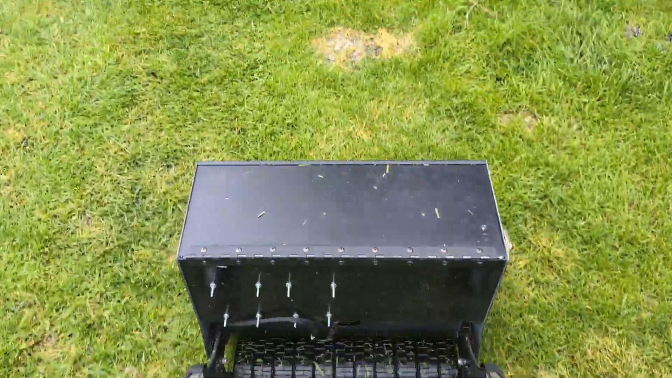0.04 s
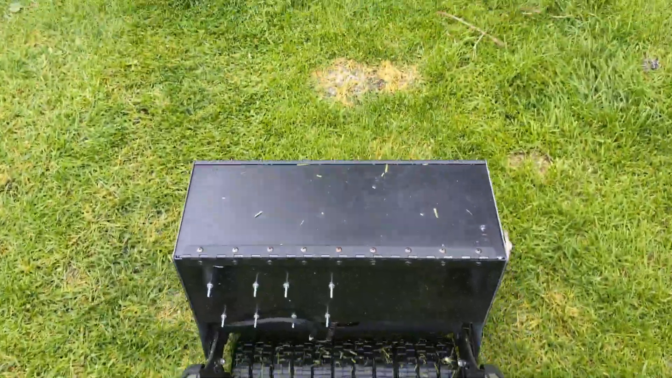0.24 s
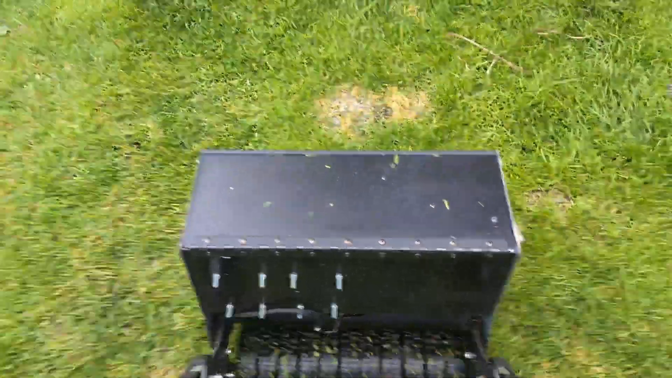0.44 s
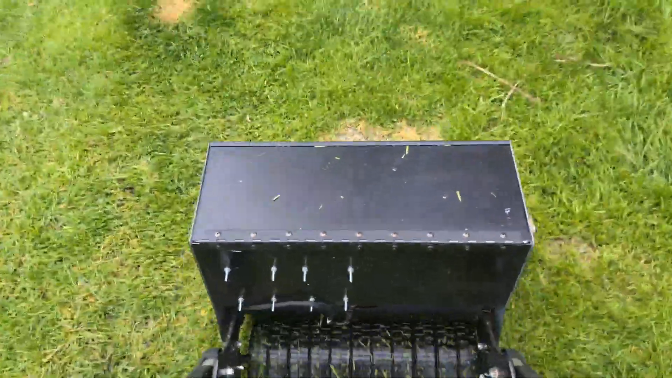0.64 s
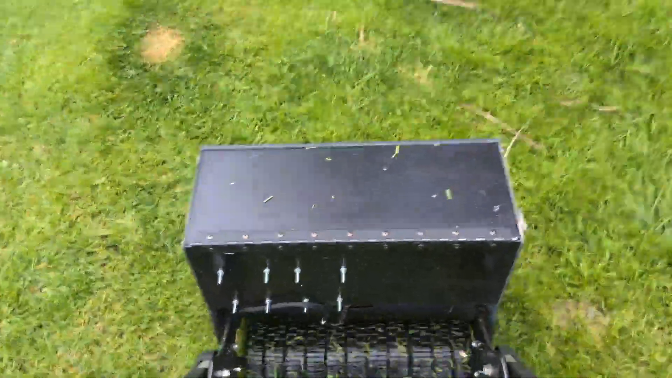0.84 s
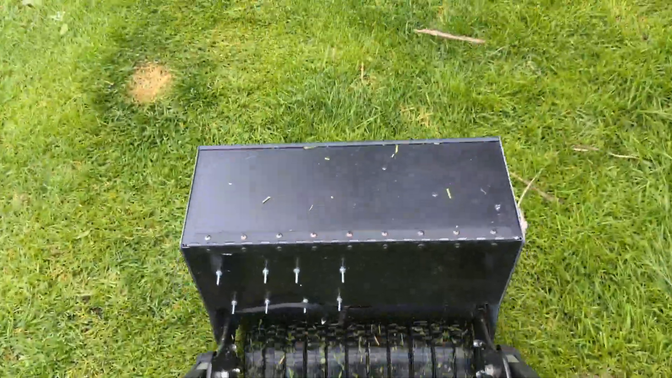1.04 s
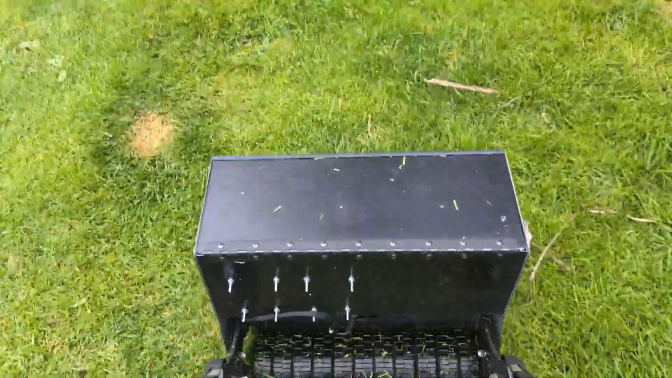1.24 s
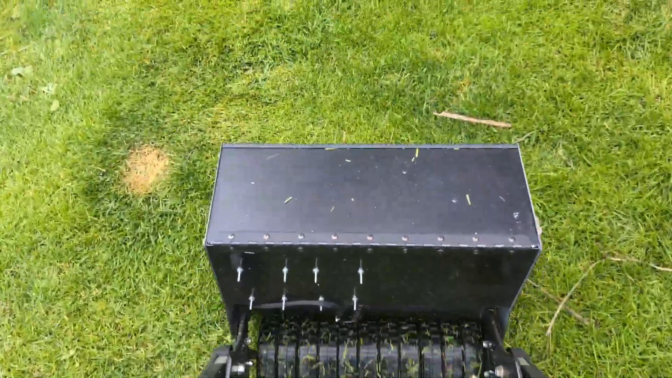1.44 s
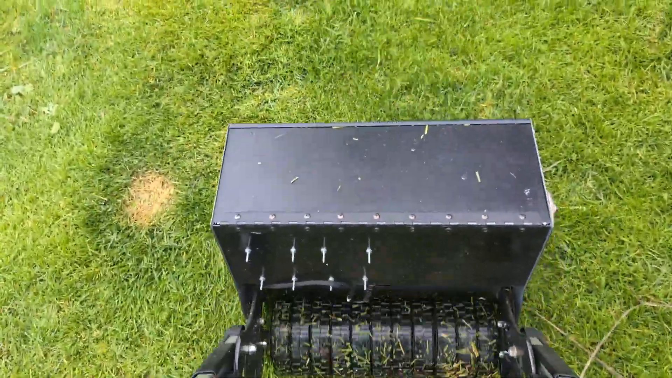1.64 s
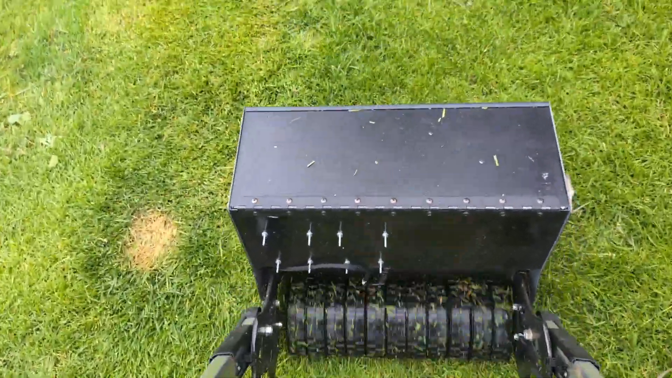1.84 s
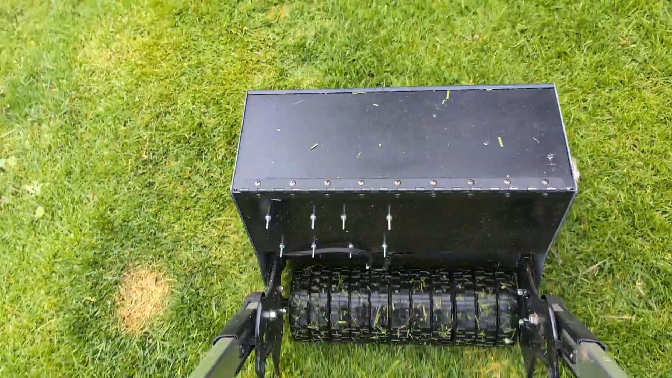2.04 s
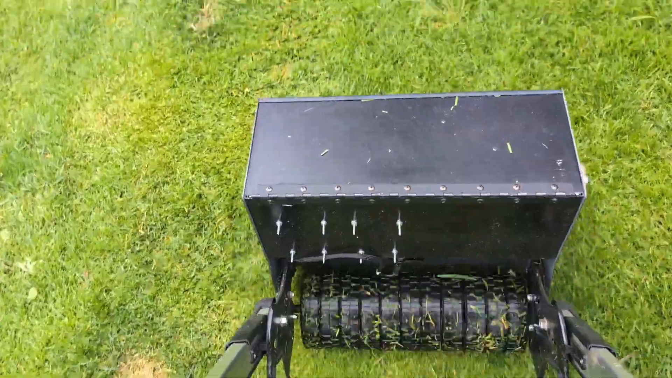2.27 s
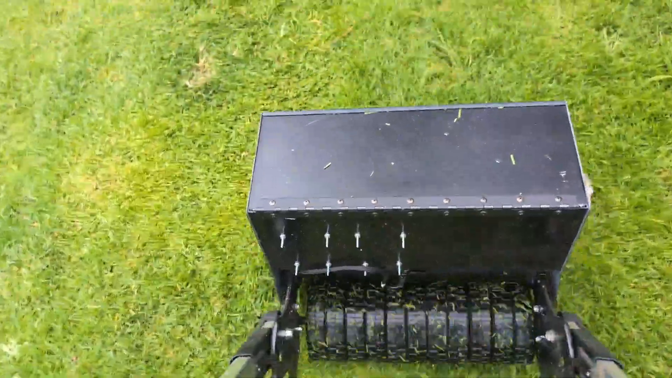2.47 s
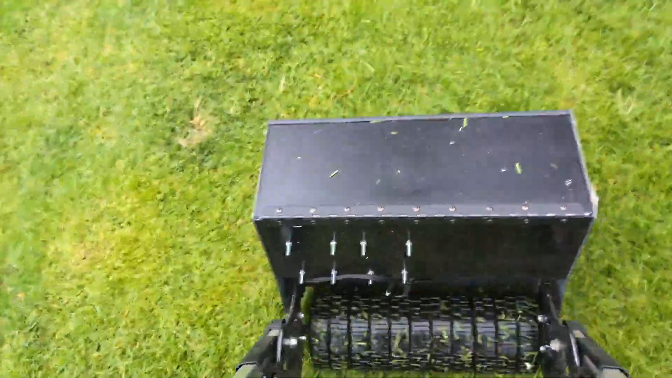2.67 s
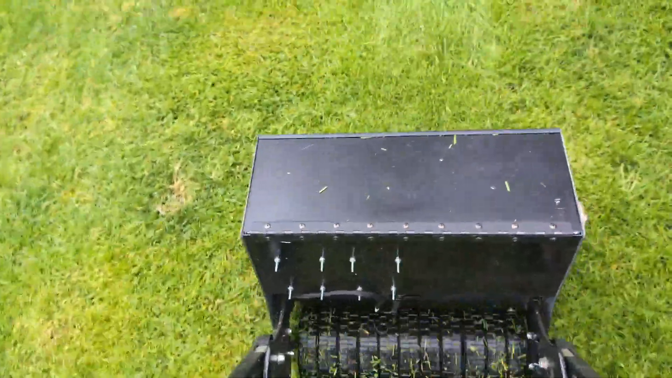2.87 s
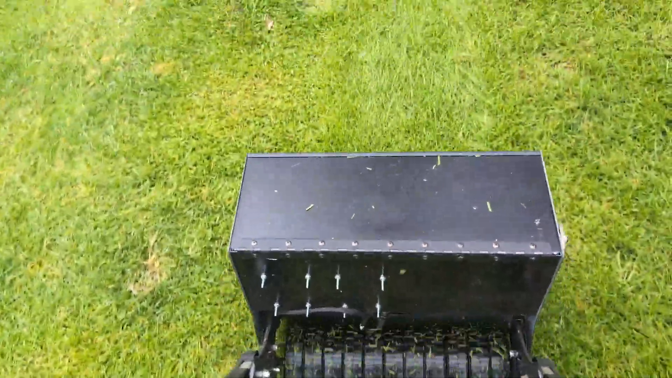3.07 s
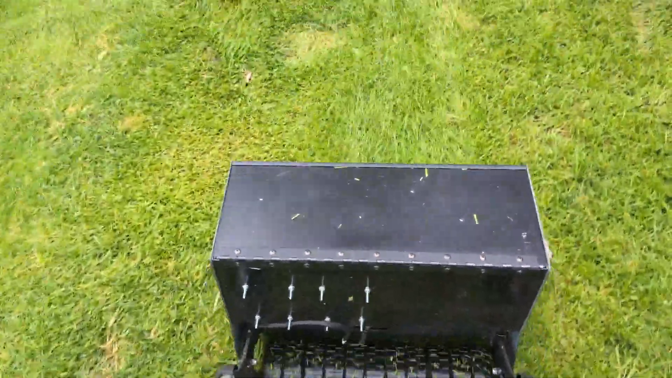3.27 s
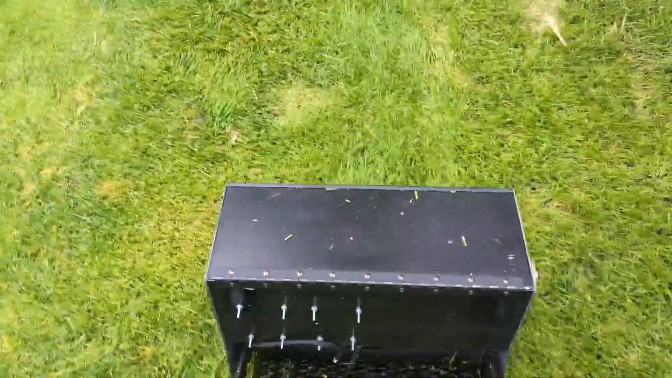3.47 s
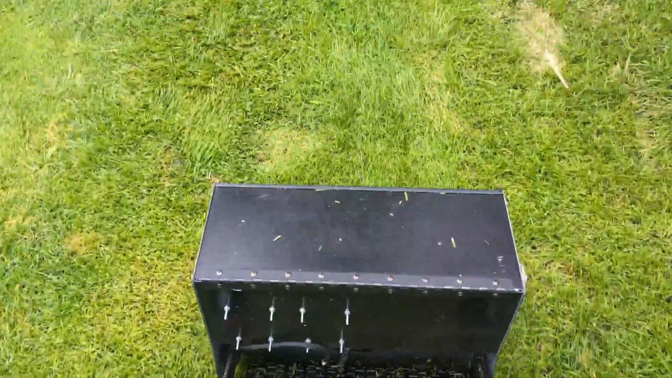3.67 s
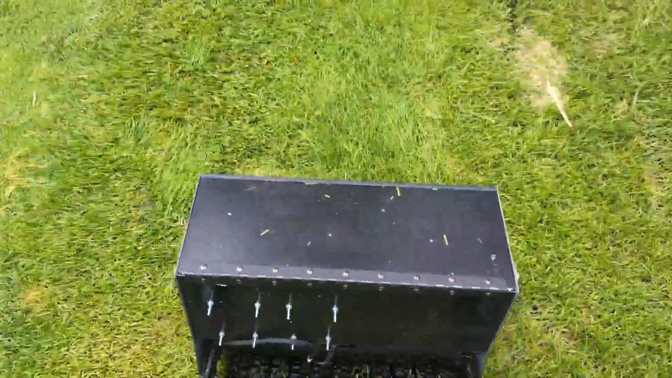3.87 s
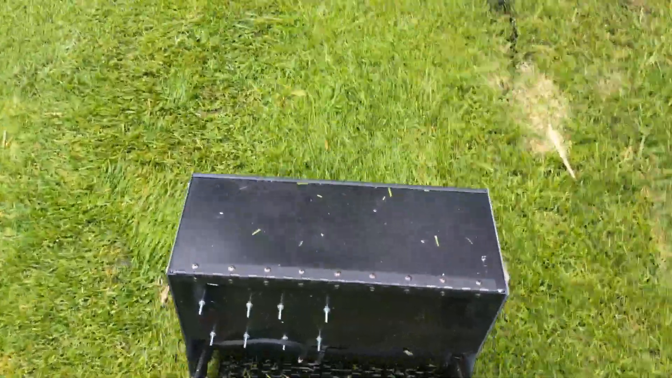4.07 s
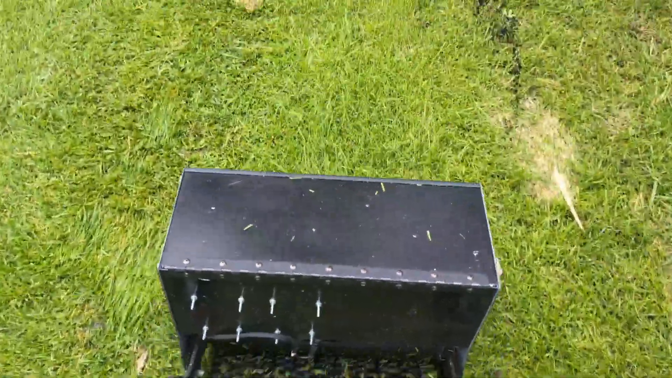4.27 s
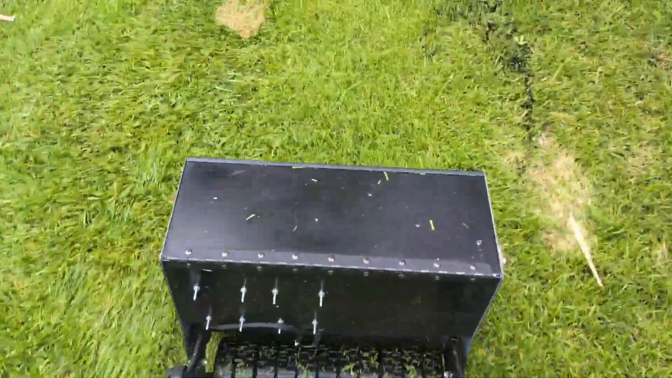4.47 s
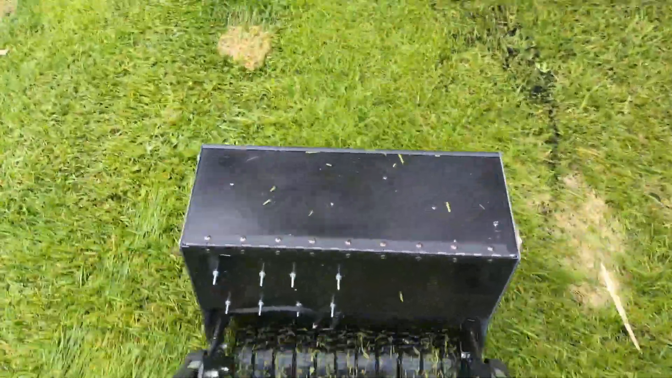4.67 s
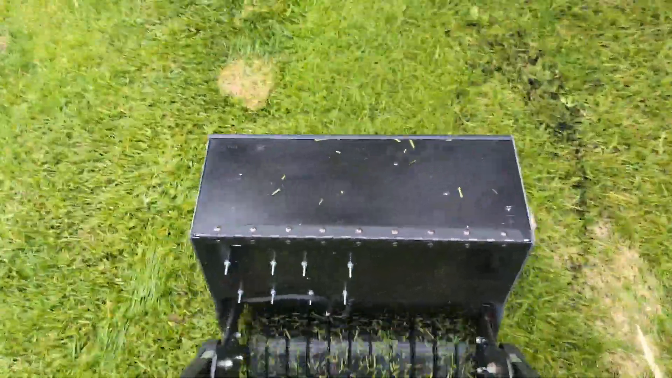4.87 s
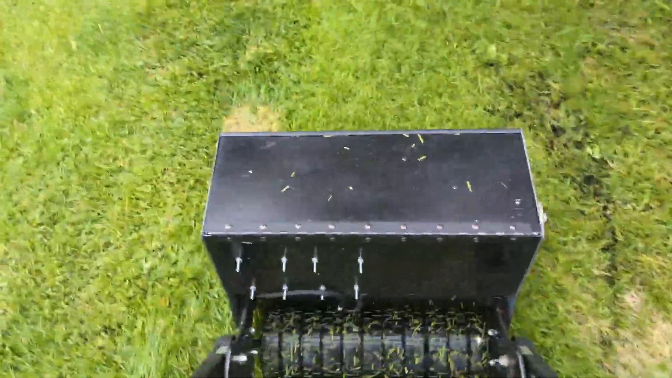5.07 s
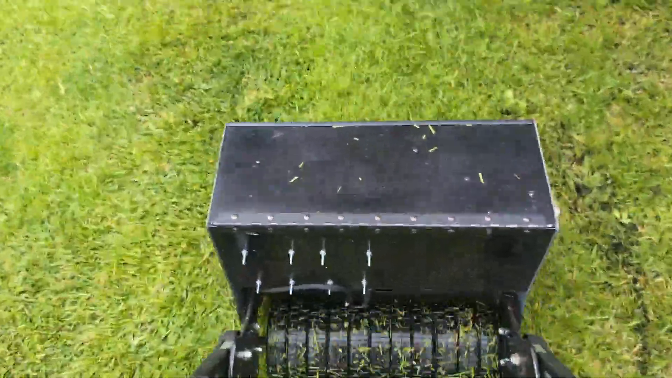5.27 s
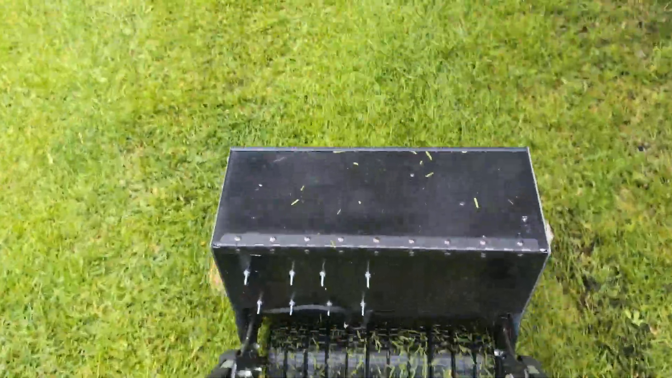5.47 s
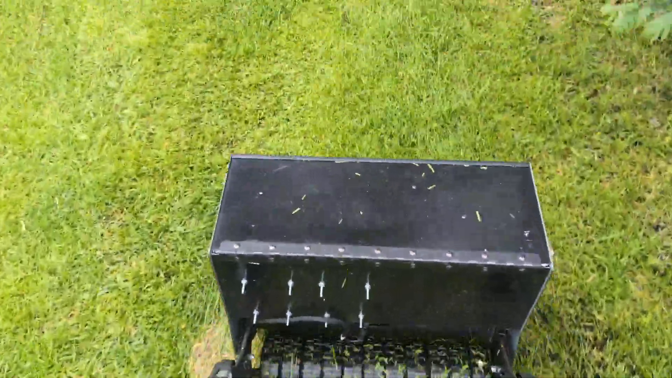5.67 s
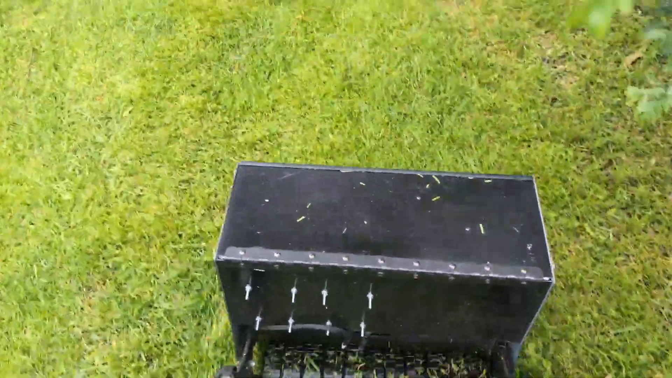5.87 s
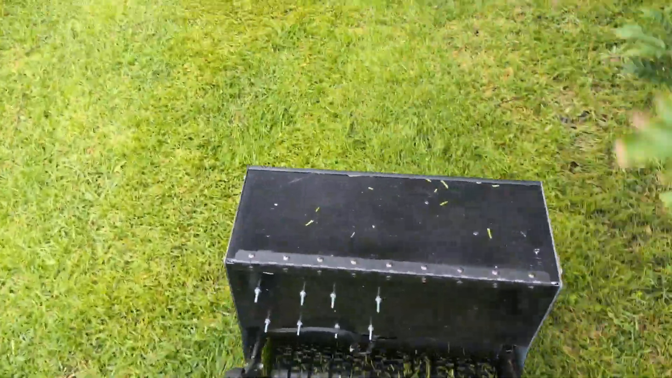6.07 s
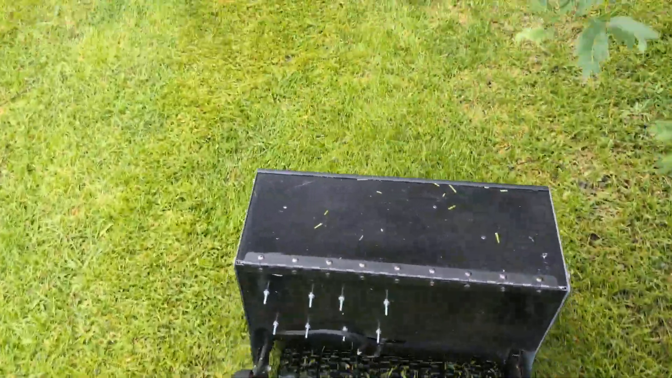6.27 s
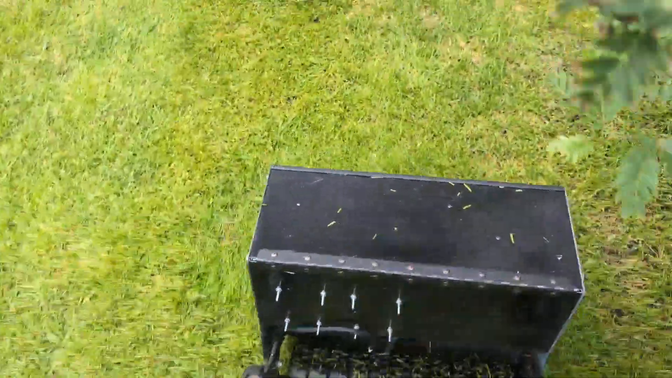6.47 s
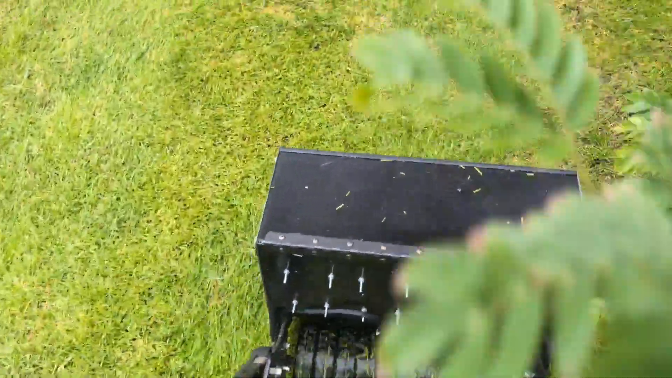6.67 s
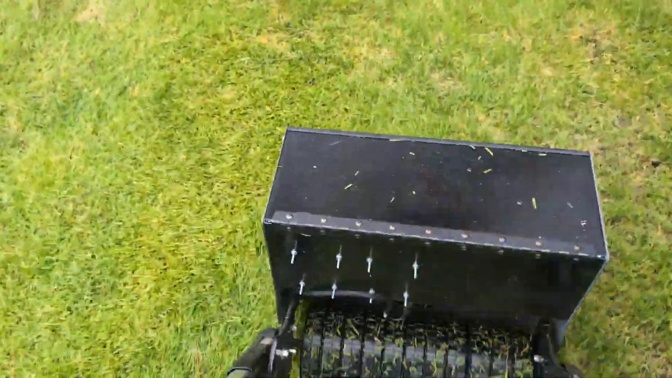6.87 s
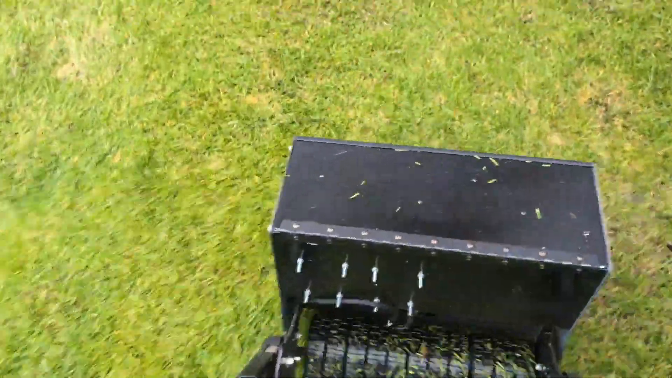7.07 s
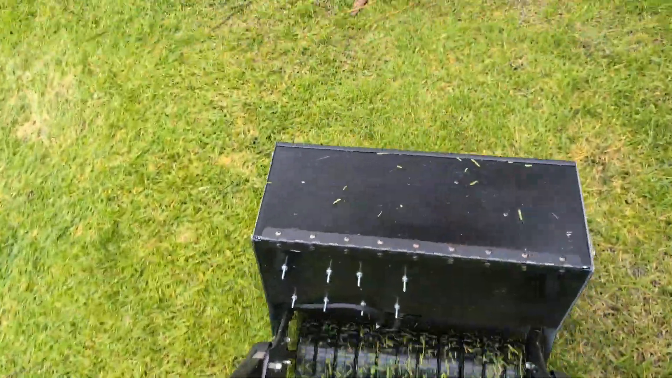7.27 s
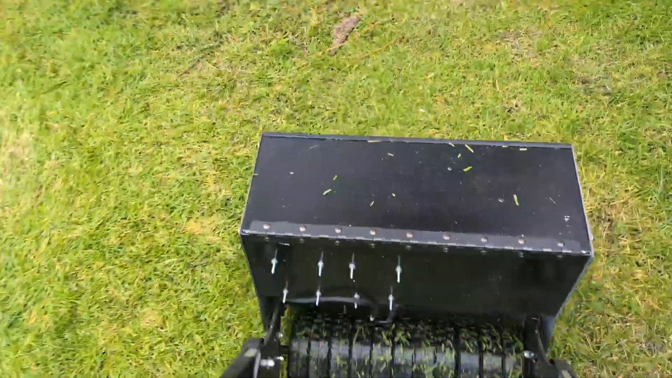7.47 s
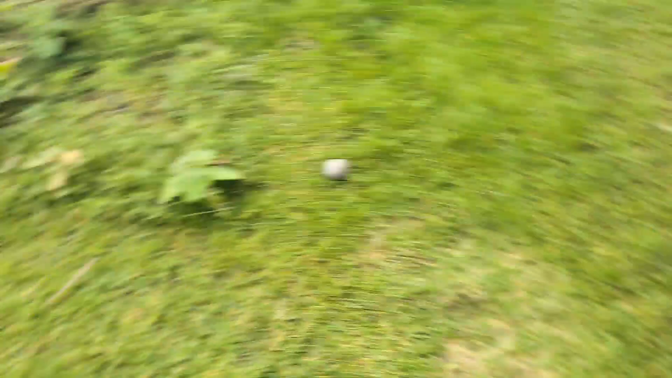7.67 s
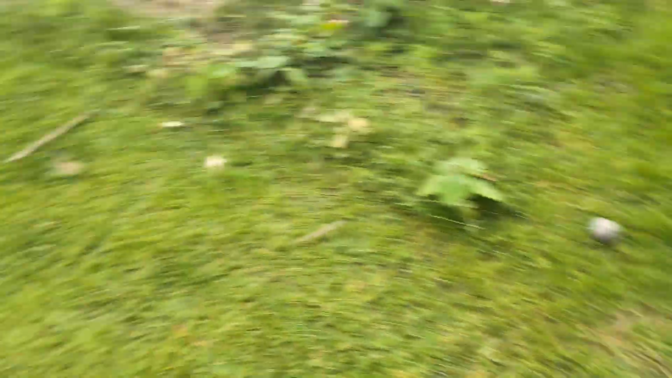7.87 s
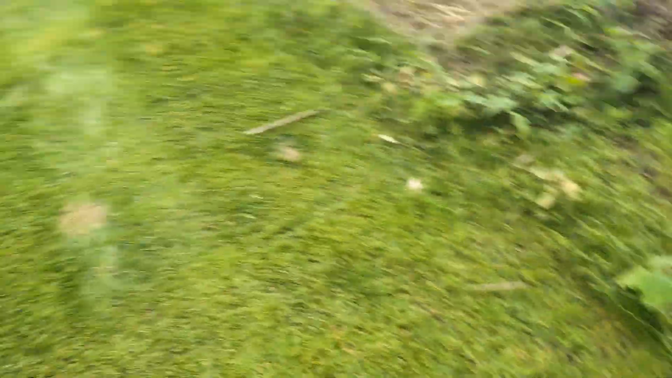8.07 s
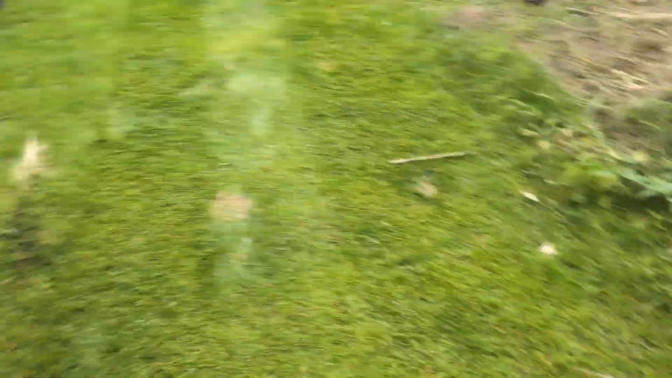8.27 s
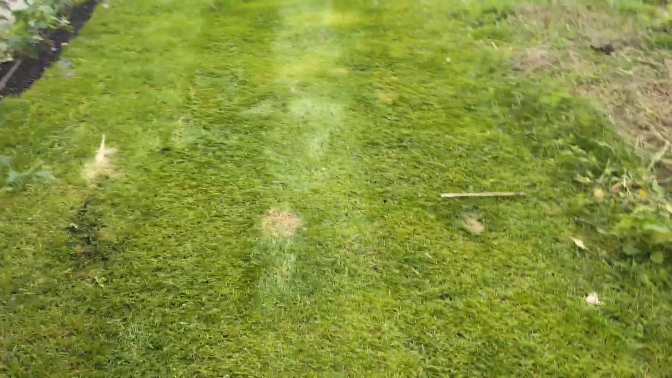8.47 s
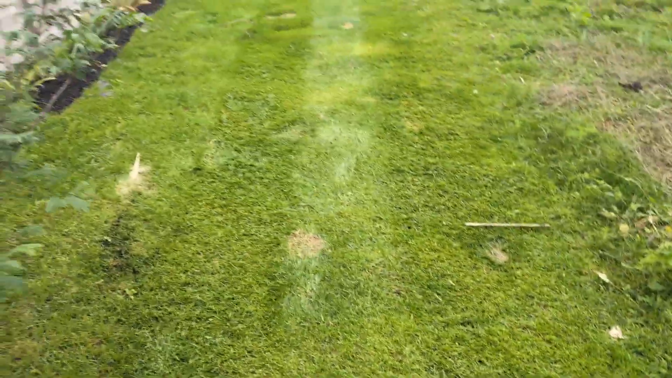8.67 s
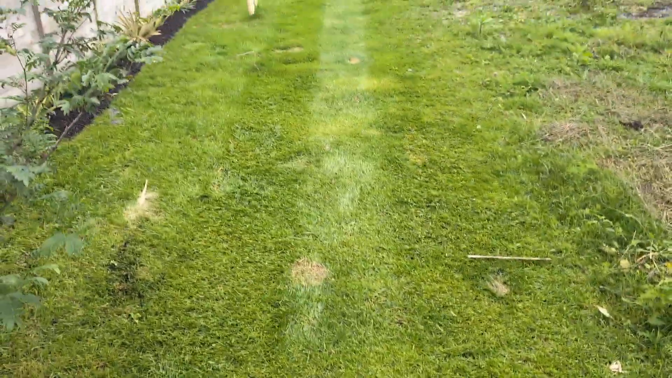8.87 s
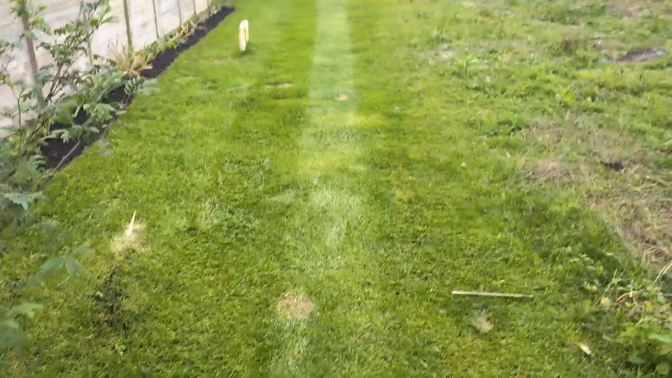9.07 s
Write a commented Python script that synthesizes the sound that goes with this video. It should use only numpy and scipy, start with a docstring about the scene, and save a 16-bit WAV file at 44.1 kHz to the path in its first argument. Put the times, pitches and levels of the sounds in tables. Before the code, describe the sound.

Stereo from the mower's handle outdoors. Five blades scrape a steel knife in a fast fluttering chatter, strongest on the right, with fine high snipping on the left, box rattle and motor whine throughout. The din stops instantly with a clank and brief squeak; loose parts clack, distant birds twitter, and a foot crackles over grass and a sharp twig against quiet rumble and hiss.

```python
"""A walled and fenced yard, heard from the handle of a battery reel mower pushed over its lawn.
Motor and drive tones follow the reel's angle; knocks rattle the resonant grass box;
five blades scrape the bed knife on every turn, snip grass and spray clippings. The mower's sound breaks off
at once, with a clank, a brief metallic ring and an echo; then birds chirp over a quiet background of filtered
noise, and feet crunch on grass and a twig, made of decaying bursts of grains."""
import sys
import numpy as np
from scipy import signal
from scipy.fft import rfft, irfft
from scipy.io import wavfile
from scipy.ndimage import uniform_filter1d

SR = 44100
rng = np.random.default_rng(int(sys.argv[2]) if len(sys.argv) > 2 else 0)


def transcribe(u):
    """Save the signal u as a 16-bit wav file named by the first command-line argument.

    u: samples, shape (n,) or (channels, n), limited to [-1, 1]; the rate is SR.
    q: integer samples, one column per channel.
    """
    v = np.clip(np.atleast_2d(u).T, -1, 1)
    q = np.round(v * 32767).astype(np.int16)
    wavfile.write(sys.argv[1], SR, q)


N = 401751
T = np.arange(N) / SR
BREAK_S = 7.575  # the mower's sound breaks off


def undb(db):
    """Logarithmic level: decibels to amplitude gain."""
    return 10 ** (np.asarray(db) / 20)


def unit(x):
    """Normalisation: scale to an rms of 1 over all channels."""
    return x / np.sqrt(np.mean(x ** 2))


def curves(table):
    """Linear interpolation: one array over time for each column of a timed table."""
    s, *columns = np.transpose(table)
    return [np.interp(T, s, c) for c in columns]


def pan(db):
    """Level difference between the ears: gains of the two channels for a left minus right level."""
    return undb(np.array([[db], [-db]]) / 2)


def colour(x, points, share=1):
    """Minimum-phase filtering: a (Hz, dB) shape, its dB times share, made causal through the cepstrum."""
    size = 8192
    hz, db = np.transpose(points)
    bins_hz = np.arange(size // 2 + 1) * SR / size
    shape = np.interp(np.log(bins_hz + 1), np.log(hz), db)
    cepstrum = irfft(np.log(undb(share * shape)))
    # folding the cepstrum onto positive time makes the response causal
    cepstrum[1:size // 2] *= 2
    cepstrum[size // 2 + 1:] = 0
    response = irfft(np.exp(rfft(cepstrum)))
    return np.apply_along_axis(signal.fftconvolve, -1, x, response)[..., :N]


def resonate(x, modes):
    """Modal superposition: damped resonances (Hz, width Hz, dB) added with alternating sign."""
    out = 0
    for k, (hz, width, db) in enumerate(modes):
        b, a = signal.iirpeak(hz, hz / width, fs=SR)
        out = out + (-1) ** k * undb(db) * signal.lfilter(b, a, x)
    return out


def walk(rate, order=12):
    """Random modulation: random levels held, smoothed by two moving averages and scaled to rms 1."""
    held = np.repeat(rng.standard_normal(int(T[-1] * rate) + 2), order)
    smooth = uniform_filter1d(uniform_filter1d(held, order), order)
    return unit(np.interp(T * rate * order, np.arange(len(held)), smooth))


def restless(x, modes, wander_db, rate):
    """Varying modal excitation: resonances that each swell and fade as the point of contact moves."""
    out = 0
    for k, mode in enumerate(modes):
        wander = undb(wander_db * np.clip(walk(rate), -2, 1.5))
        out = out + (-1) ** k * wander * resonate(x, [mode])
    return out


def clicks(rate, spread_db):
    """Shot noise: random tiny impacts, rate a second, of uneven but bounded size."""
    struck = rng.random(N) < rate / SR
    size = undb(spread_db * np.clip(rng.standard_normal(N), -2, 1))
    return unit(struck * rng.choice([-1, 1], N) * size)


def nicks(turns, jitter_s, spread_db, count):
    """Cyclic excitation: rough spots strike near the same angles on every turn, never quite alike."""
    angle, sign = rng.random(count), rng.choice([-1, 1], count)
    at = np.arange(int(turns[-1]))[:, None] + angle
    s = np.interp(at, turns, T) + jitter_s * rng.standard_normal(at.shape)
    size = sign * undb(spread_db * rng.standard_normal(at.shape))
    samples = np.clip(s * SR, 0, N - 1).astype(int)
    return unit(np.bincount(samples.ravel(), size.ravel(), N))


def bump(phase, centre, sharp):
    """Periodic modulation: a rounded swell once a cycle, peak 1."""
    return np.exp(sharp * (np.cos(2 * np.pi * (phase - centre)) - 1))


def scuff(phase, rise, fall):
    """Stick and release: a quick bite and slower release once a cycle, peak 1; times in cycles."""
    age = phase % 1
    shape = (1 - np.exp(-age / rise)) * np.exp(-age / fall)
    return shape / shape.max()


def swell(s, attack, release):
    """Transient envelope: a linear rise to 1 at time s, then exponential decay."""
    return np.clip(1 + (T - s) / attack, 0, 1) * np.exp(-np.maximum(T - s, 0) / release)


# Low rumble. Each row: frequency in Hz, gain in dB.
RUMBLE_SHAPE = [(20, -25), (38, -20), (52, -0.5), (75, -3.5), (125, -1.5), (175, -12), (255, -13),
                (400, -22.5), (1200, -37), (3000, -62), (12000, -86)]
# Distant hiss of the neighbourhood. Each row: frequency in Hz, gain in dB.
HISS_SHAPE = [(200, -23), (490, -13), (570, 3.5), (800, 0), (1200, -4.5), (1650, -2), (2200, -5),
              (2900, -18), (3900, -15), (6000, -29), (10000, -42), (15000, -54)]
RUMBLE_DB, HISS_DB = -51, -60.5
# a soft rustle swells around the step
RUSTLE_S, RUSTLE_DB, RUSTLE_ATTACK_S, RUSTLE_RELEASE_S = 8.5, -56.5, 0.29, 0.96


def background():
    """Partial coherence: a rumble largely common to both sides under diffuse hiss and a rustle."""
    rumble = unit(colour(rng.standard_normal(N) + 0.41 * rng.standard_normal((2, N)), RUMBLE_SHAPE))
    hiss = unit(colour(rng.standard_normal((2, N)) + .5 * rng.standard_normal(N), HISS_SHAPE))
    rustle = undb(RUSTLE_DB) * swell(RUSTLE_S, RUSTLE_ATTACK_S, RUSTLE_RELEASE_S)
    hiss_gain = np.hypot(undb(HISS_DB), rustle) * undb(.9 * walk(8.9))
    return rumble * undb(RUMBLE_DB + 1.2 * walk(13)) + hiss * hiss_gain


def yard_echo(x, t60=0.47):
    """Diffuse reverberation: fences and walls return a short decaying tail with little bass."""
    age = T[:SR]
    tail = rng.standard_normal((2, SR)) * np.exp(-np.log(1000) * age / t60) * (age > .006)
    tail = signal.sosfilt(signal.butter(2, 500, "high", fs=SR, output="sos"), tail)
    return signal.fftconvolve(x, tail / np.sqrt(np.sum(tail ** 2) / 2), axes=1)[:, :N]


def whistles(table, quaver):
    """Frequency modulation: short gliding tones that swell, flutter and fade, equal on both sides."""
    out, shake, flutter = np.zeros(N), walk(200), undb(3.5 * walk(76))
    for s, length, start_hz, end_hz, db in table:
        on = (T > s) & (T < s + length)
        progress = (T[on] - s) / length
        hz = (start_hz + (end_hz - start_hz) * progress) * (1 + quaver * shake[on])
        tone = np.sin(2 * np.pi * np.cumsum(hz) / SR)
        out[on] += undb(db) * flutter[on] * np.sin(np.pi * progress) * tone
    return np.array([out, out])


# Far chirps. Each row: start in seconds, length in seconds, start and end in Hz, relative level in dB.
CHIRP_NOTES = [(7.745, .05, 3050, 3030, -59), (7.785, .05, 3040, 3000, -56), (7.855, .05, 3030, 3050, -62),
               (7.85, .04, 3550, 3440, -64), (7.875, .085, 3430, 3410, -60), (7.935, .045, 3090, 2920, -56),
               (7.96, .04, 3560, 3440, -63), (7.98, .055, 2940, 3160, -59), (8.01, .05, 3450, 3400, -67),
               (8.025, .075, 3100, 3010, -60.5), (8.06, .045, 3730, 3810, -67),
               (8.1, .085, 3040, 3100, -66), (8.157, .026, 3980, 3480, -57.5),
               (8.172, .055, 3430, 3310, -61), (8.21, .035, 3020, 3000, -65),
               (8.237, .04, 3020, 2950, -52.5), (8.26, .055, 3590, 3320, -65), (8.28, .05, 2980, 3070, -64),
               (8.328, .036, 3010, 2960, -56), (8.36, .09, 3000, 3090, -63), (9.07, .057, 1620, 1600, -58)]


def birds():
    """Gliding pitch: far birds give short chirps."""
    return undb(-4) * whistles(CHIRP_NOTES, quaver=0.0084)


# Dry grass and wood underfoot, also colouring the clacks. Each row: frequency in Hz, gain in dB.
CRUNCH_SHAPE = [(200, -9), (500, -16), (800, -3.5), (1400, -6), (2200, -5), (3500, -1), (5000, -16),
                (9000, -31), (15000, -34)]


def cracks(table):
    """Granular fracture: short decaying bursts, as of loose parts clacking or stalks and wood cracking."""
    out, size = np.zeros((2, N)), SR // 4
    for s, db, length, tilt_db in table:
        start = int(s * SR)
        unevenness = undb(3.1 * np.clip(rng.standard_normal(size), -2, 1.2))
        grains = unit(rng.standard_normal((2, size)) * unevenness)
        tilt = [(hz, tilt_db * np.log2(hz / 2200)) for hz in (500, 14000)]
        burst = colour(grains * np.exp(-T[:size] / length), tilt)[:, :size]
        out[:, start:start + size] += undb(db) * burst
    return undb(6.5) * colour(out, CRUNCH_SHAPE)


# Stalks crackling under the foot. Each row: frequency in Hz, gain in dB.
STALK_SHAPE = [(300, -22), (700, 0), (2000, 2), (3800, -2), (6000, -18), (12000, -38)]
STALKS_S, STALKS_DB, STALKS_ATTACK_S, STALKS_RELEASE_S = 8.52, -59, 0.22, 0.22


def trodden(uneven_db=2.5):
    """Random impacts: stalks crackle in uneven flurries as the foot rolls over them."""
    stalks = np.array([clicks(2500, 4.5) for _ in range(2)]) + .6 * clicks(2500, 4.5)
    level = undb(STALKS_DB + uneven_db * walk(35))
    return unit(colour(stalks, STALK_SHAPE)) * level * swell(STALKS_S, STALKS_ATTACK_S, STALKS_RELEASE_S)


# Steps on the grass, and a twig that snaps fibre by fibre.
# Each row: start in seconds, relative level in dB, decay time in seconds, brightness in dB per octave.
STEP_CRACKS = [(8.085, -55, .025, 4), (8.235, -48, .005, -11), (8.459, -39, 0.0035, -4),
               (8.482, -36, .005, -4), (8.491, -43, .012, -5), (8.517, -50, .012, -9),
               (8.547, -54, .015, 4), (8.569, -33, .002, 8.5), (8.5715, -28, .003, -2.5),
               (8.5773, -41, .0015, 8), (8.579, -38, .003, 4), (8.5828, -33, .003, -4),
               (8.586, -29, .004, 0), (8.593, -38, .004, 0), (8.5993, -43, .002, 12),
               (8.6005, -35, .003, 3), (8.657, -48, 0.033, 2), (8.703, -44, .01, -7), (8.745, -56, .025, 3)]
# The twig's own ring. Each row: frequency in Hz, width in Hz, gain in dB.
TWIG_MODES = [(921, 60, -8), (1620, 90, -1), (1970, 110, 7.5), (2260, 62, 3), (3240, 70, -3)]


def footsteps():
    """Impulse excitation: cracks of grass and wood are heard directly and through the twig's modes."""
    snapped = cracks(STEP_CRACKS)
    # each mode is resonated alone, so all add with the same sign
    return undb(-2.0) * snapped + undb(1) * sum(resonate(snapped, [mode]) for mode in TWIG_MODES)


# Clacks just after the mower's sound breaks off.
# Each row: start in seconds, relative level in dB, decay time in seconds, brightness in dB per octave.
LATE_CLACKS = [(7.609, -36, 0.038, -10), (7.619, -39, .008, 2), (7.6575, -32, .006, 2)]
# A brief squeak. Each row: start in seconds, length in seconds, start and end in Hz, level in dB.
LATE_SQUEAKS = [(7.591, 0.011, 2640, 2580, -25)]


def clacks_and_squeak():
    """Grain bursts and a gliding tone: clacks and a squeak follow the mower's sound."""
    return cracks(LATE_CLACKS) + whistles(LATE_SQUEAKS, quaver=.01)


# The two microphones face different ways. Each row: frequency in Hz, left minus right in dB.
EAR_DIFFERENCE = [(100, 1.5), (600, -1), (1300, -5), (2300, -12.5), (4400, -1.5), (8000, 7), (15000, 11)]


def ears(x):
    """Directivity: each microphone colours the sound in its own way."""
    return np.array([colour(x[0], EAR_DIFFERENCE, 1 / 2), colour(x[1], EAR_DIFFERENCE, -1 / 2)])


def low_thud(t60=0.38):
    """Exponential decay: a low noisy thud swells and fades as the mower's sound breaks off."""
    age = np.maximum(T - BREAK_S, 0)
    shape = [(50, -14), (120, -4), (160, 6), (280, 1), (450, -9), (750, -9), (1300, -39)]
    body = unit(colour(rng.standard_normal(N), shape))
    return undb(-27.5) * body * (1 - np.exp(-age / 0.011)) * np.exp(-np.log(1000) * age / t60)


# Metallic ring after the break. Each row: frequency in Hz, level in dB, 60 dB decay time in seconds.
RING_MODES = [(280, -41, .3), (340, -60, 2.7), (404, -56, 1.2), (556, -47, .55), (689, -46.5, 0.62),
              (910, -51, 1.4), (953, -50, .42), (1200, -47, .33), (1814, -50.5, 1.0), (1900, -54, .6),
              (2060, -51, 0.33), (2285, -45, .2)]


def metal_ring(waver_db=3.0):
    """Free vibration: metallic modes ring once the mower's sound breaks off, wavering as they fade."""
    age, out = np.maximum(T - BREAK_S, 0), 0
    for hz, db, t60 in RING_MODES:
        decay = np.exp(-np.log(1000) * age / t60)
        out = out + undb(db + waver_db * walk(35)) * decay * np.sin(2 * np.pi * hz * age)
    return pan(0) * out


# The clank's tones. Each row: frequency in Hz, level in dB, left minus right in dB.
CLANK_TONES = [(1190, -17, -4), (1730, -24, -10), (2320, -22, -13), (2900, -27, -12), (3370, -28, -8)]
CLANK_S, CLANK_DECAY_S = 7.565, .012


def clank():
    """Damped partials: a few quickly decaying tones make a metallic clank."""
    age = np.maximum(T - CLANK_S, 0)
    steel = sum(pan(side) * undb(db) * np.sin(2 * np.pi * hz * age) for hz, db, side in CLANK_TONES)
    return steel * (1 - np.exp(-age / 0.0022)) * np.exp(-age / CLANK_DECAY_S)


# The roller on the turf. Each row: frequency in Hz, gain in dB.
ROLLER_SHAPE = [(20, -31), (36, -22), (46, 2), (85, -2.5), (130, -2.5), (250, -17), (800, -51)]


def roller():
    """Rolling noise: the turf excites the roller with noise, partly common to both sides."""
    noise = rng.standard_normal(N) + .5 * rng.standard_normal((2, N))
    return unit(colour(noise, ROLLER_SHAPE)) * undb(-61)


# Reel speed, sagging where the grass is thick. Each row: time in seconds, speed in turns a second.
REEL_SPEED = [(0.0, 13.38), (0.75, 13.41), (1.5, 13.33), (1.8, 13.36), (2.4, 13.28), (2.9, 13.39),
              (3.5, 13.33), (3.85, 13.39), (4.1, 13.34), (4.65, 13.4), (5.1, 13.28), (5.95, 13.34),
              (6.25, 13.39), (7.5, 13.37)]


def reel_speed():
    """Loading of a rotor: the reel's speed over time in turns a second."""
    return curves(REEL_SPEED)[0]


# The rattle and cutting dip briefly. Each row: centre in seconds, half length in seconds, change in dB.
DIPS = [(.66, 0.048, -1.5), (2.307, 0.0087, -6), (3.33, .04, -0.3), (5.133, .03, -2.5), (7.23, 0.032, -1.5)]
PATCHY_DB, PATCHES_PER_S = 0.26, 7  # the lawn is never quite even


def effort(db, load_db=0):
    """Load dependence: gain follows lost speed (load_db per turn a second), patchy lawn and dips."""
    speed = reel_speed()
    dip = sum(dip_db * np.exp(-((T - s) / length) ** 2) for s, length, dip_db in DIPS)
    return undb(db + load_db * (speed.mean() - speed) + PATCHY_DB * walk(PATCHES_PER_S) + dip)


# Panels of the grass box that buzz. Each row: frequency in Hz, width in Hz, gain in dB.
PANEL_MODES = [(618, 90, 2), (690, 150, -1), (855, 79, -2.5), (1160, 136, 0.5), (1254, 120, -3.5),
               (1690, 110, -3)]


def rattle(turns, rate=45, burst_s=.005):
    """Intermittent contact: loose panels clatter in bursts, harder twice in every three reel turns."""
    jolts = np.abs(clicks(rate, 2.4))
    bursts = signal.lfilter([1], [1, -np.exp(-1 / (burst_s * SR))], jolts)
    rocking = 1 + .5 * bump(turns * 2 / 3, centre=0.33, sharp=1.5)
    contacts = clicks(6000, 2) * bursts * rocking
    return unit(restless(contacts, PANEL_MODES, wander_db=2.0, rate=10)) * pan(-4.5)


# Course of the grass box's rattle. Each row: time in seconds, level in dB before centring and depth.
BOX_COURSE = [(0, -21.5), (1.15, -21.5), (1.3, -22), (1.42, -22), (2, -20), (2.25, -21.5), (2.4, -20),
              (2.6, -21.5), (3.1, -21), (3.52, -21.5), (3.7, -20.5), (3.95, -22), (4.3, -20.5),
              (4.7, -21.5), (5.1, -20.5), (5.9, -20), (6.15, -21), (6.6, -21), (7.5, -20.5)]


def shaking(depth=1.6):
    """Slow amplitude modulation: the rattle's excursions about its mean dB, multiplied by depth."""
    db = curves(BOX_COURSE)[0]
    return undb(depth * (db - db.mean()))


# Grass box and chassis. Each row: frequency in Hz, gain in dB.
BOX_SHAPE = [(60, -35), (110, -24), (143, -2), (190, -12), (230, -9.5), (275, -8), (320, -6), (372, -11.5),
             (530, -2), (690, -0.5), (770, -2), (830, -.5), (960, -8.5), (1150, -2.5), (1400, -10),
             (2500, -10), (6000, -57.5)]
MOTOR_RATIO = 13 / 4  # motor turns for each turn of the reel
CHASSIS_DB, RATTLE_DB = -23.5, -11  # the loose panels are relative to the chassis


def chassis(turns):
    """Structure-borne sound: the drive knocks at motor turns and sprocket teeth and rattles the box."""
    motor_swell = .55 * bump(turns * MOTOR_RATIO, .3, 2.1)
    drive = 1 + motor_swell + .45 * bump(turns * 26, .2, 1.5)
    knocks = clicks(2500, 4.1) + 0.23 * nicks(turns, jitter_s=.00008, spread_db=0.5, count=90)
    common = unit(colour(knocks * drive, BOX_SHAPE))
    # the panels radiate unevenly at shorter wavelengths
    uneven = [(150, -23.5), (400, -4.5), (700, -3.5), (1400, -1.0)]
    apart = unit(colour(colour(clicks(3200, 3.3) * drive, BOX_SHAPE), uneven))
    return (common + undb(-7.0) * apart * np.array([[1], [-1]])) * pan(-2.4)


# Tones of the motor shaft. Each row: multiple of its speed, level in dB, left minus right in dB.
MOTOR_TONES = [(1, -66.9, -7), (2, -62.7, -10), (4, -38.7, -2), (5, -46.8, 0), (8, -32.3, -1),
               (10, -48.4, 3), (12, -35, -1), (14, -44.4, -5), (15, -42.3, -3), (16, -33.6, 1),
               (17, -43, 0), (19, -45.1, -3), (20, -44, -3), (21, -45.9, -3), (25, -37.8, -11),
               (26, -40.7, -8)]
# Tones of the reel, mostly multiples of the blade rate.
# Each row: multiple of reel speed, level in dB, left minus right in dB.
REEL_HARMONICS = [(24, -42.5, -3), (40, -36.0, -3), (41, -44, -3), (45, -39.6, -1), (60, -37, -3),
                  (85, -43, -7), (90, -43.8, -10), (91, -42, -10), (105, -45, -12), (110, -38, -13),
                  (120, -41.3, -15), (125, -42, -14), (130, -41.5, -10), (135, -43, -12), (160, -38, -19),
                  (165, -44, -20), (171, -40, -17), (175, -45, -26), (190, -45.5, -22), (210, -51, -15),
                  (240, -47, -17)]
# The steel sings out on a reel tone as the blades rub harder.
# Each row: centre in seconds, half length in seconds, multiple of reel speed, level in dB.
SINGING = [(.24, .04, 160, -29), (1.25, .05, 125, -32), (1.42, .13, 171, -31), (1.46, .09, 110, -33),
           (1.63, .05, 160, -29), (1.97, .08, 171, -31), (2.2, .04, 160, -30), (2.42, .12, 110, -35),
           (2.78, .06, 160, -29), (3.11, .055, 160, -27), (3.18, .07, 110, -34), (3.55, .25, 125, -35),
           (3.76, .1, 160, -29), (4.21, .09, 125, -31), (4.24, .06, 110, -33), (4.36, .16, 171, -32),
           (4.72, .065, 160, -25.5), (5.41, .04, 160, -27), (5.8, .05, 110, -33), (6.1, .14, 160, -31),
           (6.32, .06, 171, -31), (7.52, .06, 171, -29)]
WAVER_DB = 0.55  # every tone wavers at least this much


def tones(turns, table, waver_db, slack, swells=()):
    """Shaft harmonics: play in the drive makes higher ones waver and blur; some sing for a moment."""
    turns = turns + slack * walk(22)
    top, out = table[-1][0], 0
    for k, db, side in table:
        power = undb(db + (WAVER_DB + waver_db * k / top) * walk(20)) ** 2
        for s, length, multiple, swell_db in swells:
            if round(multiple) == round(k):
                power = power + undb(swell_db) ** 2 * np.exp(-((T - s) / length) ** 2)
        tone = np.sin(2 * np.pi * (round(k) * turns + rng.random()))
        out = out + pan(side) * np.sqrt(2 * power) * tone
    return out


# Steady flow of clippings into the box. Each row: time in seconds, level in dB.
CLIPPING_FLOW = [(0, -33), (1, -32), (3.3, -32.5), (5.2, -35.5), (5.8, -33.5), (7.5, -32)]
# Longer tufts swishing into the box. Each row: time of the peak in seconds, level in dB.
TUFT_PUFFS = [(.03, -25.5), (.19, -26.5), (.285, -30), (.495, -29), (.645, -25), (1.3, -29), (1.87, -31),
              (2.06, -28), (2.375, -28.5), (2.575, -23.5), (2.725, -34), (3.28, -28)]
TUFT_ATTACK_S, TUFT_RELEASE_S = 0.048, 0.039


def clippings(uneven_db=1.0):
    """Addition of power: gain of the spray from an uneven flow and a puff for each tuft."""
    flow = undb(curves(CLIPPING_FLOW)[0] + uneven_db * walk(16))
    puffs = sum((undb(db) * swell(s, TUFT_ATTACK_S, TUFT_RELEASE_S)) ** 2 for s, db in TUFT_PUFFS)
    return np.sqrt(flow ** 2 + puffs)


# Snapping grass blades. Each row: frequency in Hz, gain in dB.
SNAP_SHAPE = [(500, -39.5), (1500, 3.5), (2200, -3.5), (3600, -1.5), (4600, -4.5), (7000, -3), (9300, -3.5),
              (11300, -1), (12900, -5), (15000, -6.5)]
# High rings of the blade edges. Each row: frequency in Hz, width in Hz, gain in dB.
EDGE_MODES = [(4820, 69, 2), (7740, 90, -8.5), (8330, 81, -3), (9280, 62, -0.5), (10030, 81, 0),
              (11270, 500, -7.5)]
# Rustle of clippings. Each row: frequency in Hz, gain in dB.
CLIPPING_SHAPE = [(1500, -40.5), (3300, 4), (4400, 2.5), (5700, -0.5), (7000, -10), (10000, -31),
                  (15000, -46)]
GRASS_DB, GRASS_LOAD_DB = -39, 6  # level at average speed; rise for each turn a second lost


def grass(turns):
    """Modulated impacts: stalks snap as blades close, edges ring, sprocket teeth tick, clippings spray."""
    passing, teeth = 5 * turns, 13 * turns
    closing = 0.27 * bump(passing, centre=0.24, sharp=1.3)
    ticking = .14 * bump(teeth, centre=0.23, sharp=1.8)
    cut = (1 + closing + ticking) * undb(0.71 * walk(25))
    snaps = cut * np.array([clicks(3200, 4.5) + .7 * nicks(turns, jitter_s=.00001, spread_db=2, count=130)
                            for _ in range(2)])
    edges = unit(restless(clicks(3000, 2.6) * cut, EDGE_MODES, wander_db=2.5, rate=9))
    crisp = (unit(colour(snaps, SNAP_SHAPE)) + undb(-6.5) * edges) * pan(18.5)
    pieces = np.array([clicks(4500, 2.4), clicks(4500, 3.6)]) + 0.76 * clicks(4500, 1.9)
    spray = unit(colour(pieces * cut, CLIPPING_SHAPE)) * pan(-1.1)
    return crisp * effort(GRASS_DB, GRASS_LOAD_DB) + spray * clippings()


# How hard each of the five blades meets the bed knife. Each row: tick in dB, bending in dB.
BLADE_STRENGTHS = [(-2, -3.5), (-7.5, -8.5), (-2.5, 0), (0, -3.5), (-2.5, -10.5)]
# Bending modes of the bed knife. Each row: frequency in Hz, width in Hz, gain in dB.
BENDING_MODES = [(2105, 220, 0.5), (2320, 118, 3)]
# Bed knife and reel. Each row: frequency in Hz, width in Hz, gain in dB.
KNIFE_MODES = [(1187, 78, -4), (1740, 200, -4.5), (2033, 101, 0), (2140, 30, 1.5), (2247, 230, -10),
               (2584, 70, -9.5), (2785, 48, -7.5), (2966, 240, -10.5), (3260, 30, -12), (3210, 27, -16.5),
               (3375, 96, -6.5), (3650, 63, -14.5), (3803, 41, -16.5), (4200, 82, -18.5)]
# Dry scraping between the resonances. Each row: frequency in Hz, gain in dB.
SCRAPE_SHAPE = [(800, -18), (1600, 3.5), (2300, -4), (2700, 0), (3200, 2), (3900, -6.5), (7000, -30)]
KNIFE_DB = -18
EAR_LAG_S = .00011  # the knife reaches the left microphone this much later


def knife(turns, enter=0.0993, leave=.27, tick=1.3, knock_db=-4, flare_db=-4, scrape_db=-7):
    """Frictional excitation: each spiral blade ticks twice on the bed knife, bends it and chatters."""
    passing = 5 * turns + .014 * walk(70)  # in blade passages
    blade = np.floor(passing).astype(int) % len(BLADE_STRENGTHS)
    strength_db = np.array(BLADE_STRENGTHS)[blade].T
    strike, bend = undb(strength_db + 1.5 * np.clip(walk(40), -2, 1))
    bite = 0.39 * bend * scuff(passing - .05, rise=0.098, fall=0.31)
    press = 0.75 + bite
    chatter = clicks(2200, 3.8) + 0.69 * nicks(turns, jitter_s=.00004, spread_db=5.5, count=110)
    ticks = tick * strike * (bump(passing, enter, sharp=14) + bump(passing, leave, sharp=10))
    scrape = unit(colour(clicks(4500, 3) * (.45 + ticks), SCRAPE_SHAPE))
    near = unit(restless(chatter * press, KNIFE_MODES, wander_db=1.1, rate=11))
    near = near + undb(scrape_db + 1.2 * walk(10)) * scrape
    # the knock sets the knife's bending modes ringing, and the rubbing keeps them going
    entries = np.diff(np.floor(passing - enter), prepend=-1).clip(0, 1)
    knocks = entries * bend * (T > .005)
    rubbing = clicks(5000, 2.4) * (bite + press / 4)
    flare = unit(resonate(resonate(rubbing, [(2204, 380, 0)]), [(2200, 600, 0)]))
    bending = unit(resonate(knocks, BENDING_MODES))
    near = unit(near + undb(flare_db) * flare + undb(knock_db) * bending)
    # the left microphone faces away and hears it weakly, by other paths
    far = unit(resonate(clicks(3010, 3) * press, KNIFE_MODES))
    late = np.roll(near, round(EAR_LAG_S * SR))
    return np.array([undb(-27.0) * far + undb(-28) * late, undb(4.5) * near])


def mower():
    """Synchronous rotation: moving parts follow the reel's angle; their sound breaks off all at once."""
    turns = np.cumsum(reel_speed()) / SR
    hum = tones(turns * MOTOR_RATIO, MOTOR_TONES, waver_db=2.0, slack=0.0024)
    whine = tones(turns, REEL_HARMONICS, waver_db=4.5, slack=0.00077, swells=SINGING)
    body = (chassis(turns) + undb(RATTLE_DB) * rattle(turns)) * effort(CHASSIS_DB) * shaking()
    cutting = knife(turns) * effort(KNIFE_DB) + grass(turns)
    audible = np.clip((BREAK_S - T) / 0.0033, 0, 1)
    return (hum + whine + roller() + body + cutting + clank()) * audible


def scene():
    """Direct to reverberant ratio: near steps carry little echo, far birds much; the mower has its own."""
    machine, steps, chirping = mower(), footsteps(), birds()
    echo = yard_echo(undb(-17) * steps + undb(-2) * chirping)
    around = clacks_and_squeak() + steps + trodden() + chirping + echo + background()
    return machine + undb(-16.0) * yard_echo(machine) + low_thud() + metal_ring() + ears(around)


TOP_HZ = 15250


def record(dry):
    """Band limits and saturation: the recorder cuts deep rumble, rounds peaks and cuts the top."""
    dry = signal.sosfilt(signal.butter(3, 34, "high", fs=SR, output="sos"), dry)
    rounded = dry / (1 + (dry / .96) ** 6) ** (1 / 6)
    return signal.sosfilt(signal.ellip(10, .1, 80, TOP_HZ, fs=SR, output="sos"), rounded)


dry = scene()
out = record(dry)
transcribe(out)
```